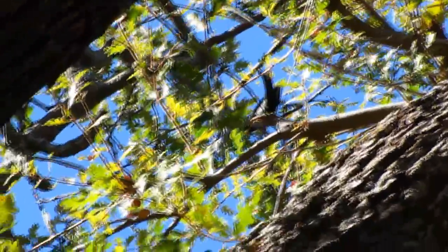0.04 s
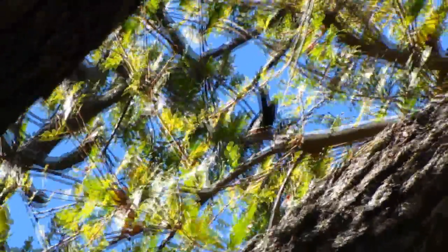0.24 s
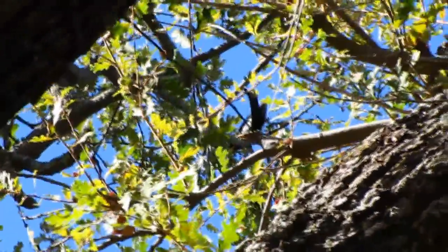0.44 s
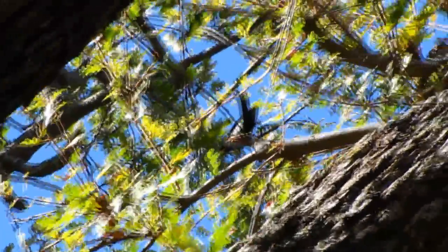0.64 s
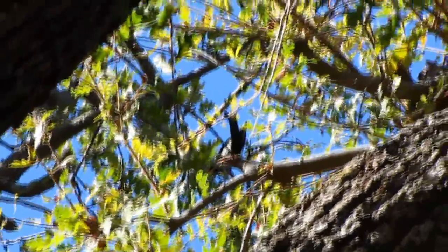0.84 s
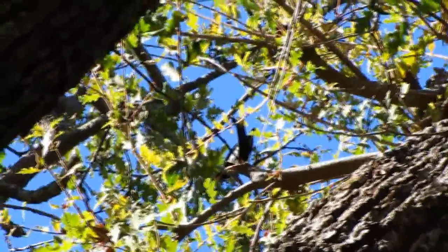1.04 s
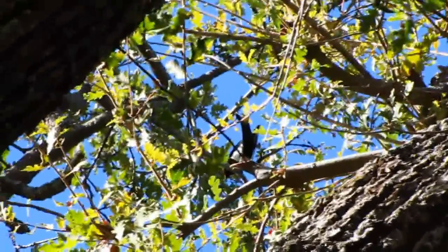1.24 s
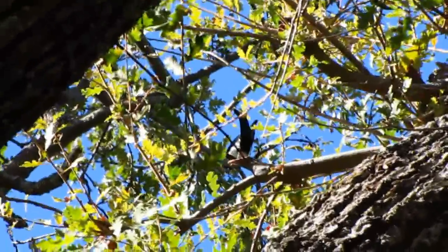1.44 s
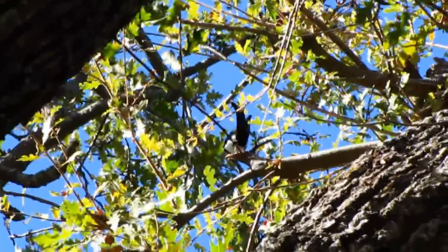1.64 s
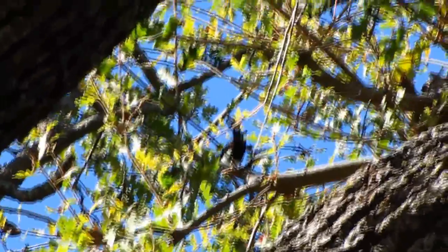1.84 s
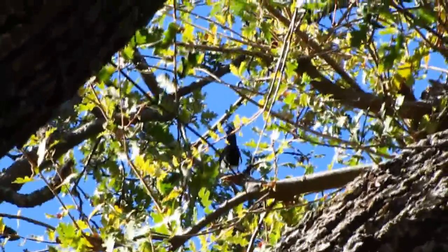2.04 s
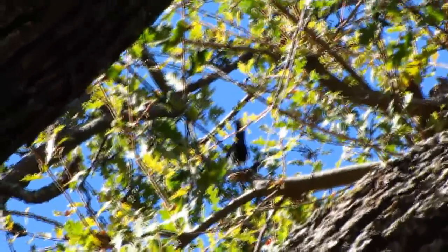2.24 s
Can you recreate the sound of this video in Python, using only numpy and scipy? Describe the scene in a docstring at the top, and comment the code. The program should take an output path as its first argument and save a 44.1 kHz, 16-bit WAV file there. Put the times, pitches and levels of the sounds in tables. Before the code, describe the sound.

A magpie's harsh chatter stands out over soft air in the leaves, a distant low hum and light wind on the microphone. A small knock comes at about 0.4 seconds. From 0.5 to 1.1 seconds the magpie gives four quick rasping notes, each rising and breaking off, with a short echo among the trees. Faint distant birds whistle at the start and again from 1.4 seconds to the end.

```python
"""Soft air in the leaves, a distant hum, a little wind on the microphone and faint far-off whistles.
One small knock rings briefly. Then a magpie up in an oak gives four harsh chattering notes: each starts
as a rasp, sweeps up to a clearer, loud top and breaks off. Its voice is a source and a filter: overtones
and pulsed air noise, shaped by the resonances of the beak. Branches and the trees around answer."""
import sys
import numpy as np
from scipy import signal
from scipy.fft import rfft, irfft, next_fast_len
from scipy.io import wavfile
from scipy.ndimage import map_coordinates

SR = 44100
rng = np.random.default_rng(int(sys.argv[2]) if len(sys.argv) > 2 else 0)


def output_pcm(signal):
    """Save a mono or channel-first signal as 16-bit PCM at the path in sys.argv[1].

    Samples are clipped to [-1, 1] before scaling.
    """
    pcm = np.clip(np.atleast_2d(signal).T, -1, 1) * 32767
    wavfile.write(sys.argv[1], SR, np.round(pcm).astype(np.int16))


N = 101429
TIME_S = np.arange(N) / SR


def amp(db):
    """Decibels to amplitude ratio."""
    return 10 ** (np.asarray(db) / 20)


def unit(x):
    """Normalisation to rms 1."""
    return x / np.sqrt(np.mean(x ** 2) + 1e-20)


def along(points, hz):
    """Interpolation of (frequency, value) points on a logarithmic frequency axis."""
    freqs, values = np.transpose(points)
    return np.interp(np.log(hz + 1), np.log(freqs + 1), values)


def wobble(rate):
    """Random modulation: a smooth curve through `rate` random values a second."""
    return map_coordinates(rng.standard_normal(N // 8), [TIME_S * rate], mode="wrap")


def filtered(x, response):
    """Linear filtering: the spectrum of x times a frequency response."""
    size = next_fast_len(N + SR // 2)
    return irfft(rfft(x, size) * response(np.fft.rfftfreq(size, 1 / SR)), size)[..., :N]


def minimum_phase(gain):
    """The causal response with this gain, by folding the cepstrum."""
    cepstrum = irfft(np.log(np.maximum(gain, 1e-6)))
    cepstrum[1:len(cepstrum) // 2] *= 2
    cepstrum[len(cepstrum) // 2 + 1:] = 0
    return np.exp(rfft(cepstrum))


def stereo_noise(gain, correlation):
    """Partly coherent noise of rms 1: the ratio of mid to side sets the left-right correlation."""
    def response(hz):
        angle = np.arccos(np.clip(along(correlation, hz), -1, 1)) / 2
        return gain(hz) * [np.cos(angle), np.sin(angle)]
    mid, side = filtered(rng.standard_normal((2, N)), response)
    return unit(np.array([mid + side, mid - side]))


def scatter(x, t60s, build_s):
    """Diffuse reflection: convolution with stereo noise that decays exponentially in each band."""
    hz, t, spectrum = signal.stft(rng.standard_normal((2, SR * 3 // 4)), SR, nperseg=256)
    tail = signal.istft(spectrum * amp(-60 * t / along(t60s, hz)[:, None]), SR, nperseg=256)[1]
    tail *= 1 - np.exp(-(np.arange(tail.shape[1]) / SR / build_s) ** 2)
    return signal.fftconvolve(x[None], tail / np.linalg.norm(tail[0]), axes=1)[:, :N]


# spectrum of the air in the leaves: frequency_hz, relative_db
AIR_SPECTRUM = [(82, -37), (140, -4), (248, -3), (514, -7.5), (1060, -6.5), (1220, -7), (1320, -6),
                (1550, -8.5), (3080, -13.5), (4850, -19.5), (8930, -26), (15500, -37.5)]
# its left-right likeness: frequency_hz, correlation
AIR_CORRELATION = [(60, 0.22), (180, 0.46), (550, 0.69), (1650, 0.39), (4970, 0.012), (15000, 0.01)]

def leaf_air():
    """Broadband noise of air in the leaves, swaying slightly and slowly easing."""
    level_db = -49.5 - 0.56 * TIME_S
    air = stereo_noise(lambda hz: amp(along(AIR_SPECTRUM, hz)), AIR_CORRELATION)
    return air * amp(level_db + 0.4 * wobble(5.7))


def distant_hum(centre_hz=104.2, half_width_hz=13.3):
    """Narrowband noise: a single spectral peak is heard as a low hum."""
    peak = lambda hz: 1 / (1 + ((hz - centre_hz) / half_width_hz) ** 2)
    return amp(-53.5) * stereo_noise(peak, correlation=[(100, 0.95)])


# spectrum of the wind rumble: frequency_hz, relative_db
WIND_SPECTRUM = [(10, -6), (28, 4.5), (50, 0.5), (85, -4), (130, -24), (250, -45), (800, -60)]
# course of the gusts: time_s, relative_db
WIND_GUSTS = [(0.0, -45.5), (0.04, -45.5), (0.16, -48.5), (0.18, -40.5), (0.57, -52), (1.38, -53),
              (1.81, -47.5), (1.83, -41.5), (1.96, -50.5), (1.98, -41), (2.23, -44), (2.3, -47.5)]

def microphone_wind():
    """Turbulent pressure on the microphone: a gusting rumble, weakly correlated between the sides."""
    gust_db = np.interp(TIME_S, *np.transpose(WIND_GUSTS)) + 2
    rumble = stereo_noise(lambda hz: amp(along(WIND_SPECTRUM, hz)), [(30, 0.18), (90, 0.47)])
    return amp(gust_db) * rumble


# decay of sound among the trees: frequency_hz, t60_s
WOOD_DECAY = [(1000, 0.33), (2700, 0.54), (5000, 0.68), (9000, 0.35), (14000, 0.81)]

def wood_reverb(x):
    """Reverberation: scattering among the trees leaves a diffuse tail."""
    return scatter(x, WOOD_DECAY, build_s=0.0098)


def whistle(hz, waver, flutter_db=3):
    """A pure tone under random amplitude and frequency modulation."""
    level = amp(flutter_db * wobble(90))
    pitch_hz = hz * (1 + waver * wobble(900))
    return level * np.sin(2 * np.pi * np.cumsum(pitch_hz) / SR)


# far whistles and chirps: start_s, length_s, first_hz, last_hz, level_db, waver_fraction
BIRD_GLIDES = [(0.043, 0.11, 8950, 9120, -68.5, .0145), (0.07, 0.0074, 3110, 3340, -51, .033),
               (0.168, 0.052, 2610, 2400, -55, .087), (.485, 0.031, 3440, 3600, -56, .015),
               (1.42, 0.26, 8600, 8500, -70.5, .02), (1.487, 0.067, 2457, 3200, -57, .06),
               (1.554, 0.054, 2456, 2674, -55.5, .07), (1.559, .0464, 3860, 4100, -62, .0475),
               (1.863, 0.14, 4020, 3625, -56, .012), (1.916, .16, 5800, 4180, -58, .048),
               (1.88, .12, 8100, 6500, -64.5, .09), (2.031, .27, 3603, 2760, -60, .03)]
# partials of a very high, held whistle: frequency_hz, level_db
HELD_PARTIALS = [(7865, -68), (10180, -55.5), (14100, -76)]

def far_birds(held_start_s=2.18, held_rise_s=0.086):
    """Exponential pitch glides and one held whistle, blurred by reverberation."""
    calls = np.zeros(N)
    for start, length, first_hz, last_hz, db, waver in BIRD_GLIDES:
        progress = np.clip((TIME_S - start) / length, 0, 1)
        arch = np.sqrt(abs(np.sin(np.pi * progress)))
        calls += amp(db) * arch * whistle(first_hz * (last_hz / first_hz) ** progress, waver)
    fade_in = np.clip((TIME_S - held_start_s) / held_rise_s, 0, 1)
    calls += fade_in * sum(amp(db) * whistle(hz, waver=0.0024) for hz, db in HELD_PARTIALS)
    return calls + amp(-5) * wood_reverb(calls)


# resonances of the knock: frequency_hz, relative_db, t60_s
DAMPED_MODES = [(604, -6, 0.023), (774, 4.5, 0.021), (1230, -4.5, 0.019), (3000, -8, 0.012),
                (4280, -18, 0.00235)]

def knock(start_s=0.3732, tick_cutoff_hz=4970):
    """Impact close by: a tick of noise and the free decay of a few damped modes."""
    age_s = np.maximum(TIME_S - start_s, 0)
    decay = lambda t60: amp(-60 * age_s / t60) * (age_s > 0)
    ring = sum(amp(db) * decay(t60) * np.sin(2 * np.pi * hz * age_s) for hz, db, t60 in DAMPED_MODES)
    noise = unit(filtered(rng.standard_normal(N), lambda hz: 1 / (1 + (hz / tick_cutoff_hz) ** 3)))
    tick = noise * decay(t60=0.002)
    bass_cut = signal.butter(2, 423, "highpass", fs=SR, output="sos")
    return signal.sosfilt(bass_cut, amp(-28.5) * ring + amp(-21) * tick)


# echoes off near branches: delay_s, left_gain, right_gain
BRANCH_ECHOES = [(.0047, 0.29, 0.077), (.0096, 0.24, 0.18), (0.0174, .18, .16)]
# stereo balance of the magpie: frequency_hz, left_minus_right_db
MAGPIE_BALANCE = [(1500, 0), (2700, -2.5), (4500, 5), (6500, 0.5), (9000, 2.5)]
# colour of the answer from the trees: frequency_hz, relative_db
WOOD_SPECTRUM = [(1500, 8), (2300, 6), (2800, 5.5), (3600, 6), (4300, 8), (5100, 2.5), (5600, 0),
                 (7500, 6.5)]

def canopy(x):
    """Multipath propagation: direct sound, echoes off branches and twigs, and the tail of the wood."""
    def echoes(hz):
        return sum(np.array([[left], [right]]) * np.exp(-2j * np.pi * hz * delay_s)
                   for delay_s, left, right in BRANCH_ECHOES)
    twigs = amp(-10) * scatter(x, t60s=[(3000, 0.04)], build_s=0.00089)
    near = x + filtered(x, echoes) + twigs
    near = filtered(near, lambda hz: amp(along(MAGPIE_BALANCE, hz) * np.array([[0.5], [-0.5]])))
    far = wood_reverb(filtered(x, lambda hz: amp(along(WOOD_SPECTRUM, hz))))
    return near + amp(-11.5) * far


# resonances of the half-open beak: frequency_hz, relative_db
BEAK_HALF_OPEN = [(600, -48), (1100, -20.5), (1400, -12), (1900, -2), (2450, 1), (2900, -5.5),
                  (3700, -21.5), (4500, -8.5), (5500, -4.5), (6300, -11.5), (7300, -21), (8400, -19.5),
                  (10000, -28), (16000, -50)]
# resonances of the wide-open beak: frequency_hz, relative_db
BEAK_WIDE_OPEN = [(600, -51), (1200, -21.5), (1900, -5.5), (2700, 1.5), (3500, -11.5), (4150, -10),
                  (4900, -2), (5700, -3), (7400, -17.5), (8600, -10), (10000, -27.5), (13000, -33),
                  (16000, -66)]

def rasp(phase, opening, ragged_db=1):
    """Pulsed excitation: air noise, chopped once a cycle, rings in the opening beak."""
    puffs = rng.standard_normal(N) * np.sqrt(1 + np.cos(phase)) * amp(ragged_db * wobble(250))
    half, wide = (unit(filtered(puffs, lambda hz: minimum_phase(amp(along(shape, hz)))))
                  for shape in (BEAK_HALF_OPEN, BEAK_WIDE_OPEN))
    return (1 - opening) * half + opening * wide


# overtones of the clear voice: harmonic_number, relative_db
VOICE_HARMONICS = [(2, -17.5), (3, -9.5), (4, 0), (5, -12.5), (6, -9), (7, -2), (8, -17), (9, -22),
                   (11, -18), (12, -13.5), (13, -15)]
# the beak passes little bass: frequency_hz, gain_db
BEAK_RESPONSE = [(800, -20.5), (1300, -7), (1800, -3), (2600, 3.5), (3500, -5), (5000, 0), (7000, -1.5),
                 (8700, -10.5), (10000, -27)]

def clear_voice(pitch_hz, phase, effort_db, opening, shimmer_db=2.5):
    """A harmonic series filtered by the beak; more effort gives more treble."""
    contrast = 0.45 + 0.55 * opening  # the fourth and seventh harmonics stand out as the beak opens
    tone = np.zeros(N)
    for k, db in VOICE_HARMONICS:
        treble_db = 0.9 * effort_db * (k > 6)
        level_db = db * contrast + along(BEAK_RESPONSE, k * pitch_hz) + treble_db
        tone += amp(level_db + shimmer_db * wobble(300)) * np.sin(k * phase + rng.uniform(0, 2 * np.pi))
    return tone


# the magpie's notes: start_s, top_s, end_s, top_pitch_hz, level_db, swell_db_per_s, attack_s
MAGPIE_NOTES = [(0.535, 0.593, 0.6005, 704.8, -24.5, 127, .016), (.657, .720, 0.73, 736, -22.5, 106, .012),
                (.804, 0.873, .890, 765, -22, 106, .036), (.970, 1.043, 1.058, 734.2, -23, 104, .03)]
REST_HZ, SWEEP_S, FALL_HZ_PER_S = 384.4, 0.042, 11000
LOUDEST_BEFORE_TOP_S, FADE_DB_PER_S, RELEASE_S = 0.0054, 179, 0.0083
CLEAR_S, CLEAR_DB, OPENING_S = 0.0084, 2.5, 0.024

def syllables():
    """Pitch and amplitude envelopes: each note swells, rises and clears toward its top, then drops."""
    onsets_s = [start - attack for start, *_, attack in MAGPIE_NOTES]
    note = np.maximum(np.searchsorted(onsets_s, TIME_S) - 1, 0)
    start, top, end, top_hz, db, swell, attack = np.array(MAGPIE_NOTES)[note].T
    past_top_s = TIME_S - top
    rise_hz = (top_hz - REST_HZ) * np.exp(np.minimum(past_top_s, 0) / SWEEP_S)
    fall_hz = FALL_HZ_PER_S * np.maximum(past_top_s, 0)
    pitch_hz = REST_HZ + np.maximum(rise_hz - fall_hz, 0)
    past_peak_s = past_top_s + LOUDEST_BEFORE_TOP_S
    clarity = np.exp(-(past_peak_s / CLEAR_S) ** 2)
    opening = np.exp(-(np.minimum(past_peak_s, 0) / OPENING_S) ** 2)
    effort_db = np.minimum(swell * past_peak_s, -FADE_DB_PER_S * past_peak_s) + CLEAR_DB * (clarity - 1)
    fade_in = np.clip((TIME_S - start) / attack + 0.5, 0, 1)
    fade_out = np.clip((end - TIME_S) / RELEASE_S + 0.5, 0, 1)
    return pitch_hz, fade_in * fade_out * amp(db + effort_db), clarity, effort_db, opening


def magpie():
    """Source-filter voice: one oscillation drives tone and rasp; the rasp gives way near each top."""
    pitch_hz, level, clarity, effort_db, opening = syllables()
    jitter = 0.019 - 0.013 * clarity  # the pitch steadies as the voice clears
    phase = 2 * np.pi * np.cumsum(pitch_hz * (1 + jitter * wobble(450))) / SR
    tone = amp(-4.5 + 3 * clarity) * clear_voice(pitch_hz, phase, effort_db, opening)
    noise = amp(-4.5 - 3.5 * clarity) * rasp(phase, opening)
    return level * (tone + noise)


def scene():
    """Superposition of the magpie in its tree and everything around it."""
    events = canopy(magpie()) + knock() + far_birds()
    background = (leaf_air() + distant_hum()) * amp([[0.4], [-0.4]])  # slightly to the left
    return events + background + microphone_wind()


def record(dry, cutoff_hz=15900):
    """Band limiting: an ideal low-pass filter."""
    return filtered(dry, lambda hz: hz < cutoff_hz)


dry = scene()
out = record(dry)
output_pcm(out)
```